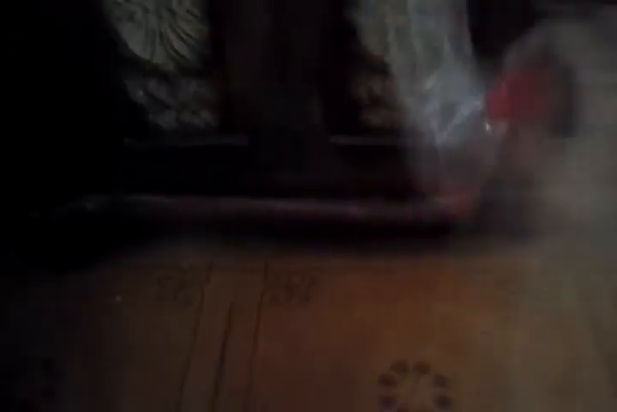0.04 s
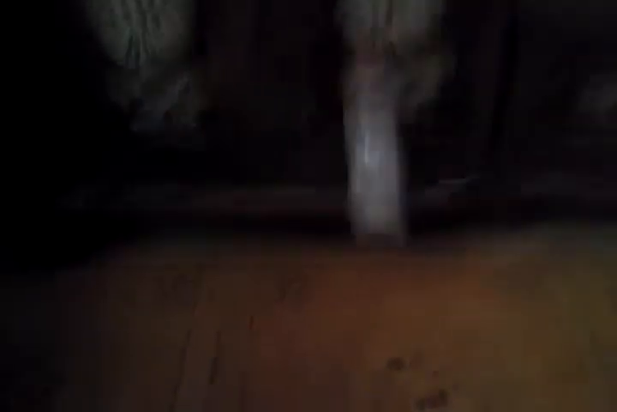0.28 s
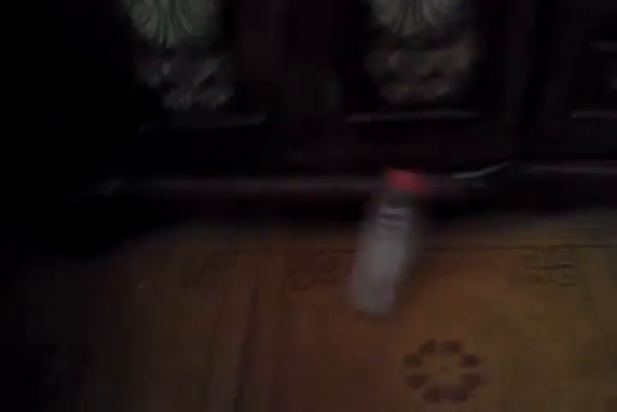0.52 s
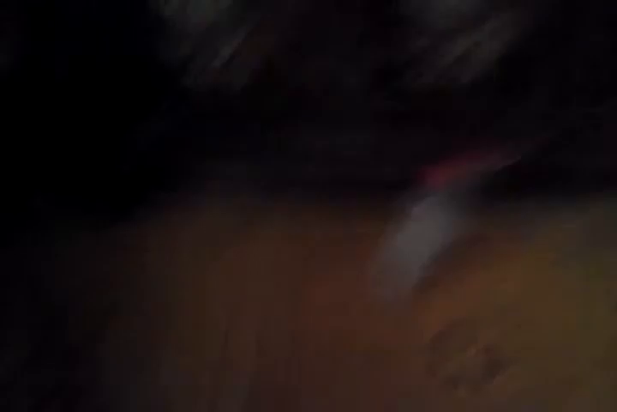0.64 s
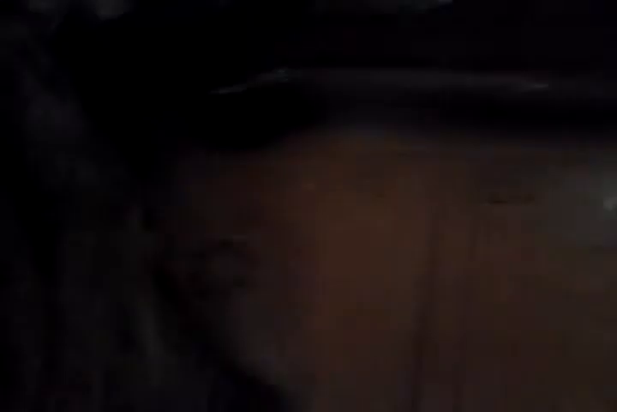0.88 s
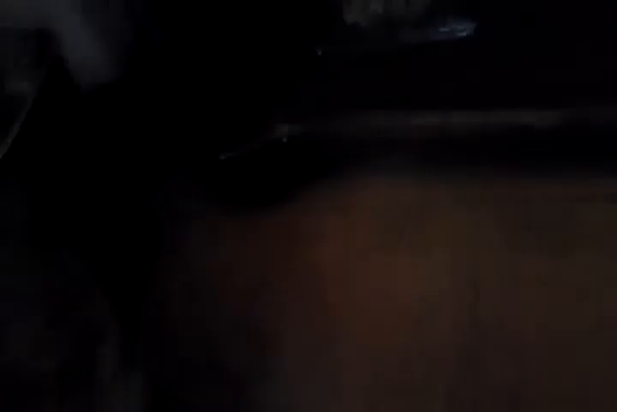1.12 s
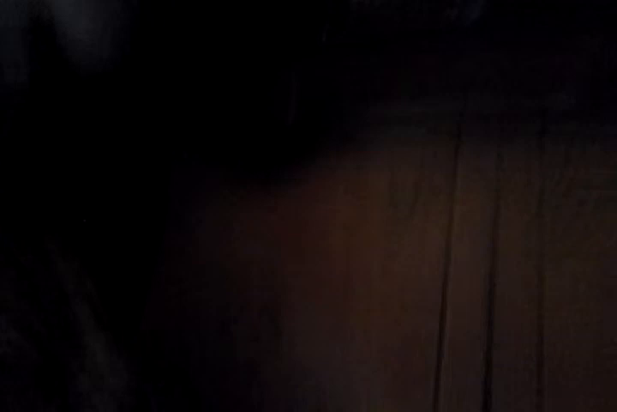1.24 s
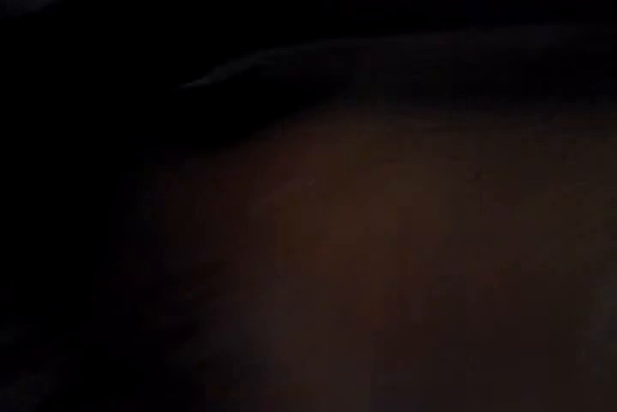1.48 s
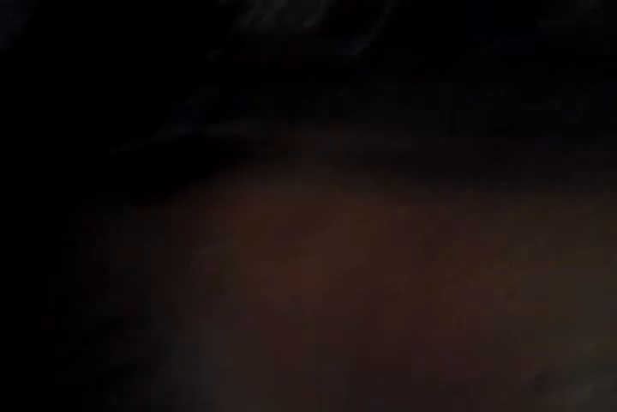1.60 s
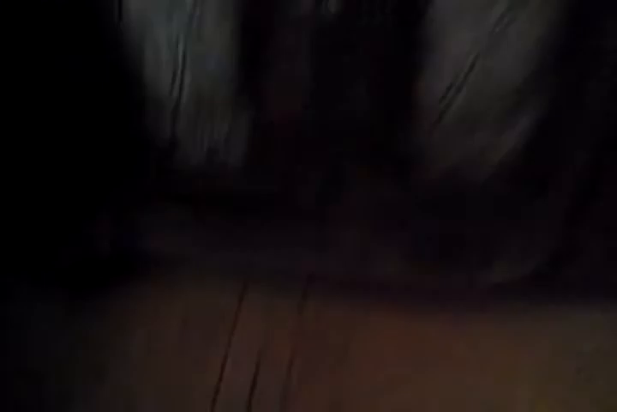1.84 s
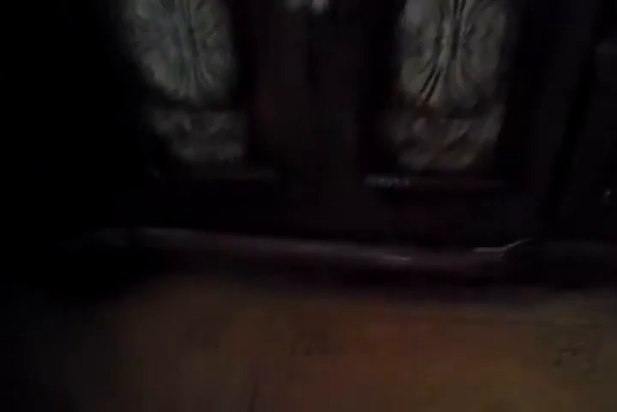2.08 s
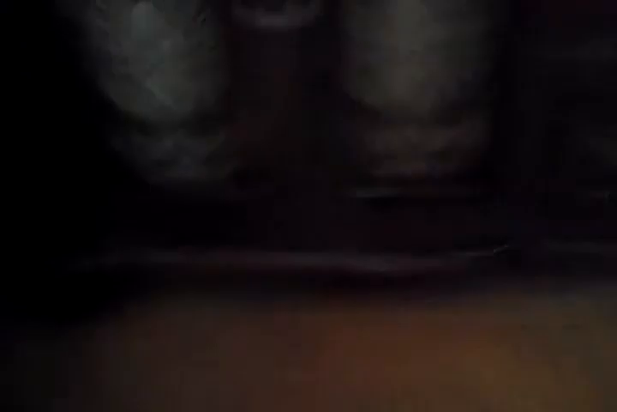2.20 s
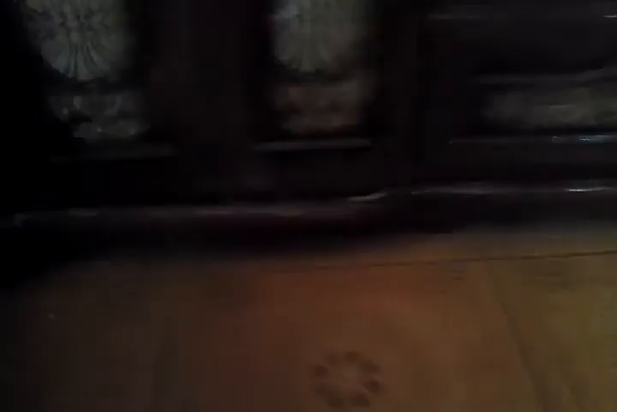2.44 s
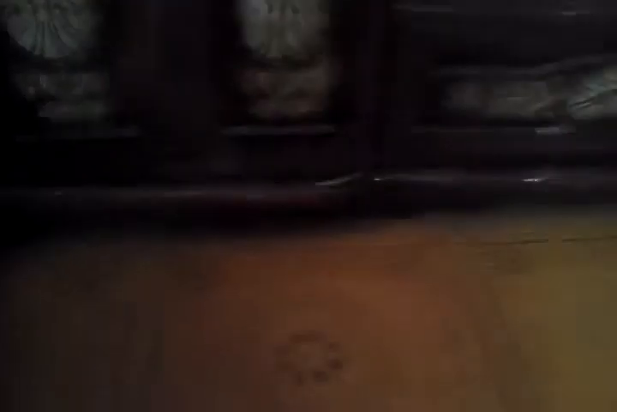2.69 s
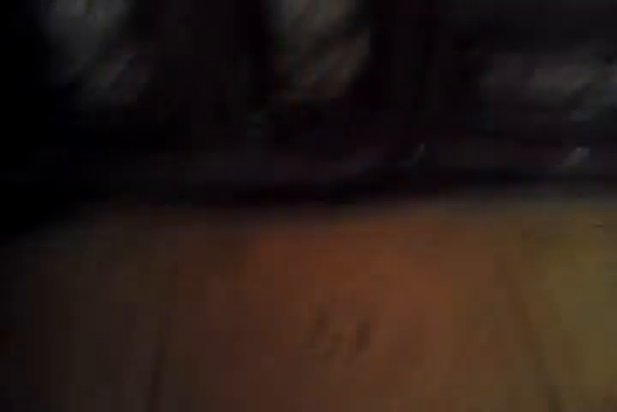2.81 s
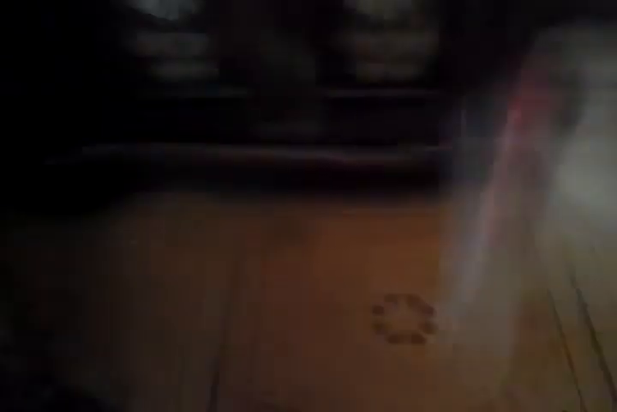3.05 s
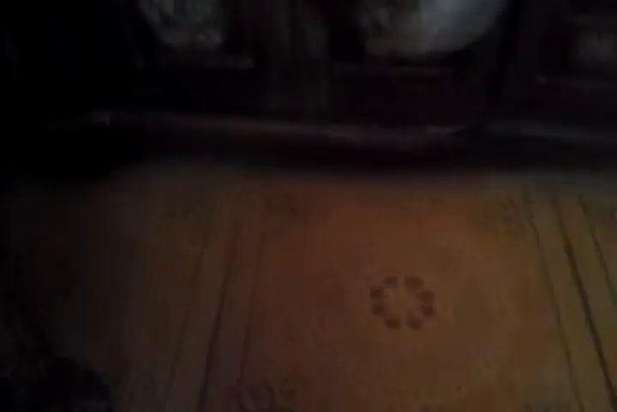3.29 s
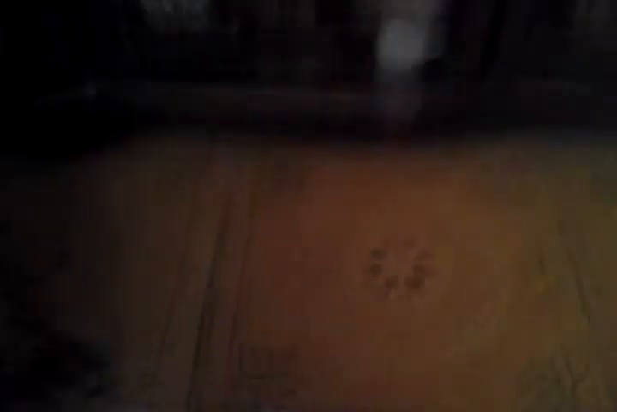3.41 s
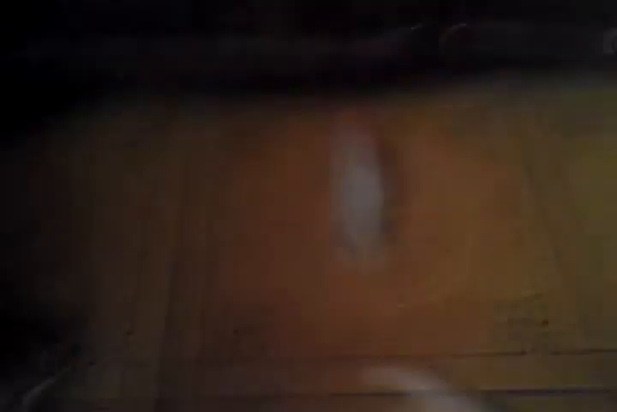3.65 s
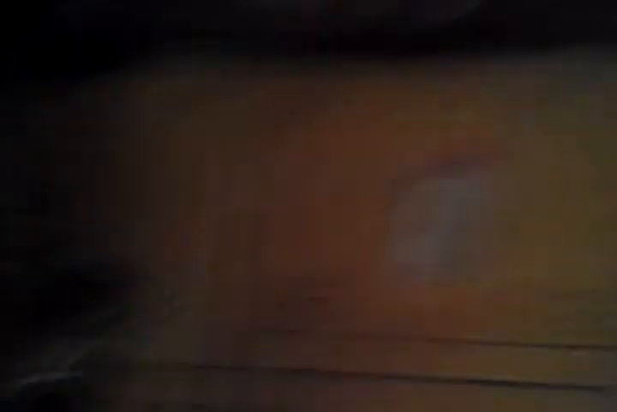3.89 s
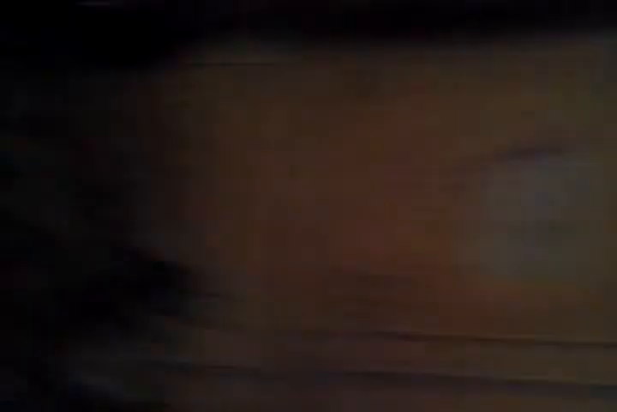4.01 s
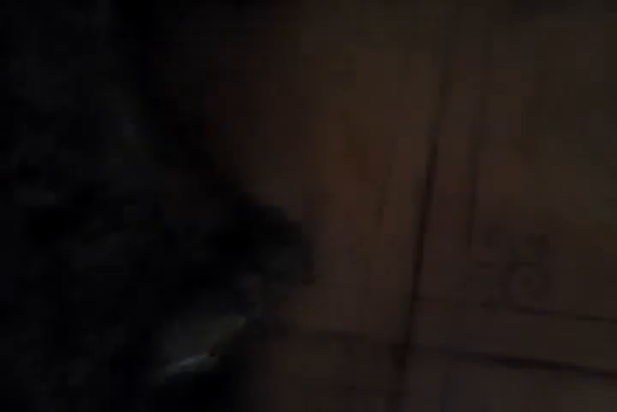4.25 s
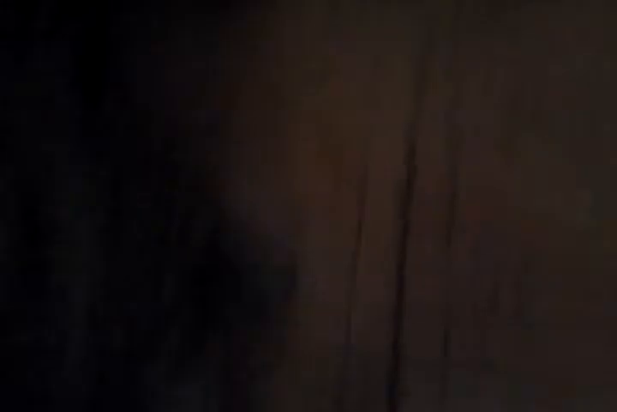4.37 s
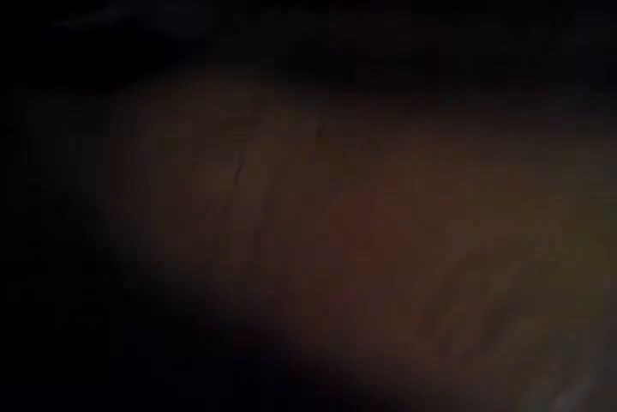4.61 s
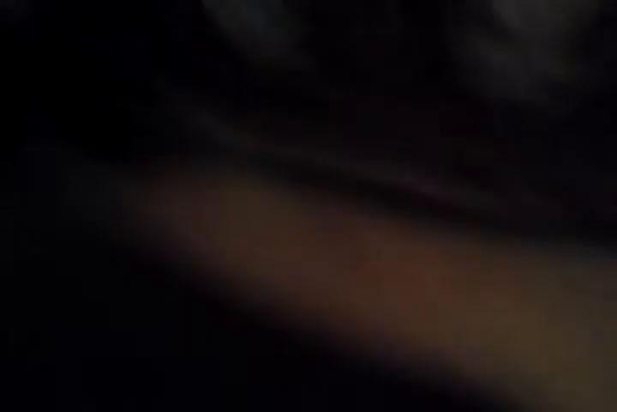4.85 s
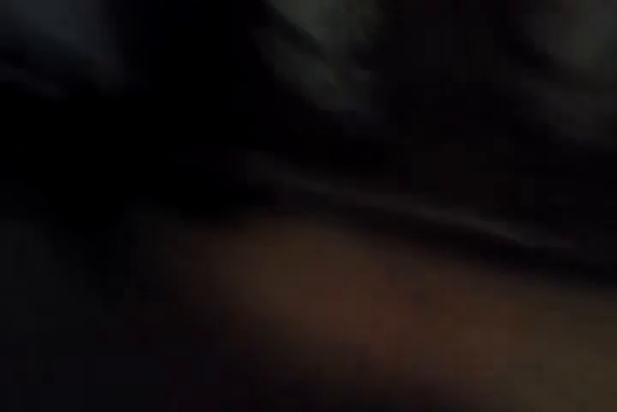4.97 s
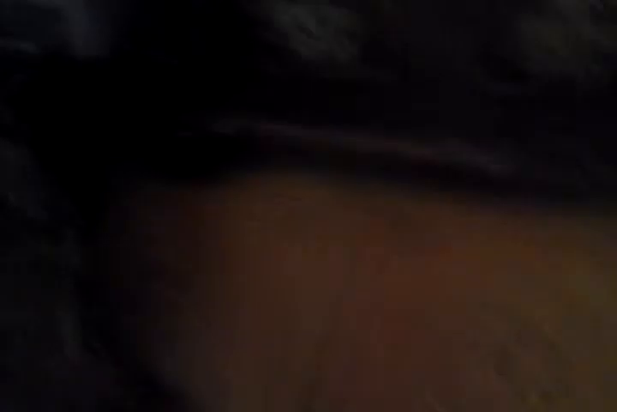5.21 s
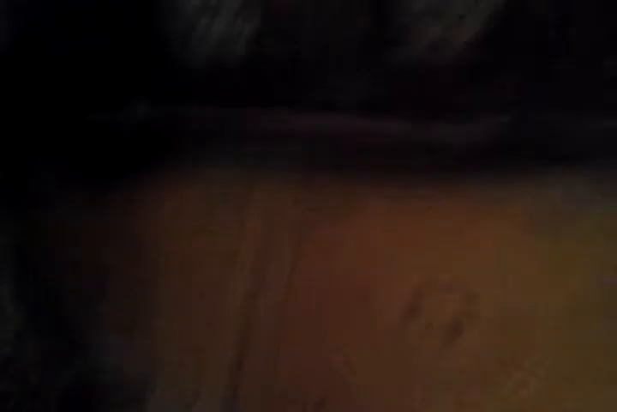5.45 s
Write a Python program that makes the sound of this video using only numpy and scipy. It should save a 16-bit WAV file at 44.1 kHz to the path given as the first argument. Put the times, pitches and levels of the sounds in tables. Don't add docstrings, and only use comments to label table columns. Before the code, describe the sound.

A small room with a rug over boards, heard through a hissy handheld camera with wide, phase-odd stereo. From 0 to 0.16 s, fingers bump the case in low thuds, strongest at left, with a grainy grip rumble fading afterwards. At 0.24-0.34 s a part-filled plastic bottle lands: loud hollow knocks, clipped peaks, water cracking on the wall, fizz and gurgle, a low floor thump. It bounces at 0.48 s and knocks over around 0.97-1.05 s. From 1.2 to 2.4 s there are quiet cloth swishes, dry plastic ticks and a soft pick-up, then mostly hiss. At 3.2 s comes a light tick and rustle; at 3.43, 3.55 and 3.66 s the second flip lands and bounces, hollow and watery, with short reflections. A sharp plastic snap at 4.18 s precedes crinkling finger ticks to 4.65 s, a small click at 4.5 s, and faint cloth rustling to the end.

```python
import sys
import numpy as np
from scipy import signal
from scipy.fft import rfft, irfft, next_fast_len
from scipy.io import wavfile
from scipy.ndimage import uniform_filter1d

SR = 44100
rng = np.random.default_rng(int(sys.argv[2]) if len(sys.argv) > 2 else 0)


def amplitude_ratio(level_db):
    exponent = np.asarray(level_db, float) / 20
    return 10 ** exponent


def output_pcm(signal):
    pcm = np.clip(np.atleast_2d(signal).T, -1, 1) * 32767
    wavfile.write(sys.argv[1], SR, np.round(pcm).astype(np.int16))


N = 245195

# frequency in Hz, density in dB per Hz.
GRIT_SPECTRUM = [(240, -0.5), (400, -6.5), (473, 1), (672, -11.5), (885, -7), (1100, -8), (2540, -15),
                 (5880, -16), (14100, -28.5), (15400, -55)]


def evened(x):
    return x / np.sqrt(np.mean(x ** 2) + 1e-20)


def read(points, hz):
    f, value = np.transpose(points)
    return np.interp(np.log(hz + 1), np.log(f + 1), value)


def add(mix, start_s, sound):
    part = mix[..., round(start_s * SR):][..., :sound.shape[-1]]
    part += sound[..., :part.shape[-1]]


def filtered(x, hz, kind):
    return signal.sosfilt(signal.butter(2, hz, kind, fs=SR, output="sos"), x)


def colour(x, spectrum, tilt_db=0):
    hz = np.fft.rfftfreq(x.shape[-1], 1 / SR)
    gain_db = read(spectrum, hz) + tilt_db * np.log2((hz + 50) / 3000)
    return irfft(rfft(x) * amplitude_ratio(gain_db), x.shape[-1])


def level(curves, column):
    t = np.arange(N) / SR
    gain = np.zeros(N)
    for curve in curves:
        points = np.array(curve)
        gain += amplitude_ratio(np.interp(t, points[:, 0], points[:, column], -120, -120))
    return uniform_filter1d(gain, size=700)


def ring(hz, db, t60_s, rise_s=0.00023):
    t = np.arange(round(t60_s * SR) + 8) / SR
    return amplitude_ratio(db - 60 * t / t60_s) * (1 - np.exp(-t / rise_s)) * np.sin(2 * np.pi * hz * t)


def crackle(shape, per_s, spread_db):
    size = amplitude_ratio(spread_db * np.minimum(rng.exponential(1, shape), 5))
    return rng.standard_normal(shape) * size * (rng.random(shape) < per_s / SR)


def ports(a, b, same, lean):
    size = next_fast_len(N + 4096)
    hz = np.fft.rfftfreq(size, 1 / SR)
    likeness = np.clip(read(same, hz), -.98, .98)
    gain = amplitude_ratio(-read(lean, hz))
    a, b = rfft(a, size), rfft(b, size)
    right = gain * (likeness * a + np.sqrt(1 - likeness ** 2) * b)
    mid = np.sqrt(1 + 2 * likeness * gain + gain ** 2)
    return irfft(2 * np.array([a, right]) / mid, size)[:, :N]


def hiss():
    # frequency in Hz, density in dB per Hz.
    hiss_spectrum = [(12, -39), (20, -7), (38, -15), (144, -5.5), (289, -4), (323, -2), (361, -6.5),
                     (647, -3), (1010, -2), (1490, -4), (2900, -13), (6150, -7.5), (9080, -17.5),
                     (14200, -24), (15400, -41)]
    # frequency in Hz, likeness of the two ports from -1 to 1.
    hiss_likeness = [(60, -0.14), (180, -0.8), (550, -0.28), (1640, 0.19), (4960, -0.11), (15000, 0.054)]
    # frequency in Hz, left over right in dB.
    hiss_lean = [(60, 2.0), (99, 2.5), (160, 1), (270, 5), (450, 3.5), (740, 2), (1220, 1), (2010, 2.5),
                 (3320, 1), (5480, -8), (9050, 5.5), (15000, -3)]
    hiss_db = -54.5
    hz, t, z = signal.stft(rng.standard_normal((2, N)), SR, nperseg=512)
    patches = uniform_filter1d(rng.standard_normal(z.shape), 6, 1)
    patches = evened(uniform_filter1d(patches, 10, 2))
    noise = signal.istft(z * amplitude_ratio(1.65 * patches), SR, nperseg=512)[1][:, :N]
    a, b = amplitude_ratio(hiss_db) * evened(colour(noise, hiss_spectrum))
    return ports(a, b, hiss_likeness, hiss_lean)


def room(x):
    # frequency in Hz, t60 in s.
    decay_times = [(120, 0.6), (300, 0.39), (700, 0.39), (1800, 0.4), (5000, 0.4), (12000, 0.37)]
    taps = np.zeros((2, SR // 2))
    at = np.arange(200, SR // 2 - 20, 20)
    at = at + rng.integers(0, 20, (2, len(at)))
    np.put_along_axis(taps, at, rng.choice([-1., 1.], at.shape), 1)
    hz, t, z = signal.stft(taps, SR, nperseg=256)
    decay = amplitude_ratio(-60 * t / read(decay_times, hz)[:, None])
    tail = signal.istft(z * decay, SR, nperseg=256)[1]
    return signal.fftconvolve(x, tail / np.linalg.norm(tail[0]), axes=1)[:, :N]


def pane():
    # frequency in Hz, level in dB, t60 in s.
    pane_modes = [(3870, -46, .6), (3905, -50, .7), (7800, -56, .2)]
    out = np.zeros((2, N))
    for hz, db, t60_s in pane_modes:
        add(out, 0, [[1], [-1]] * ring(hz, db, t60_s))
    return out


def strokes(column):
    # start in s, hold in s, soft swish in dB, crisp rustle in dB.
    slides = [(0.02, .04, -52, -51), (0.62, .04, -53, -55), (0.86, .08, -60, -58), (1.28, .4, -59, -56),
              (1.77, .07, -51, -60), (2.15, .06, -47.5, -53), (3.2, .02, -57, -52), (3.26, .01, -70, -65),
              (3.84, .22, -70, -58), (4.36, .06, -52, -54), (4.6, .05, -62, -56), (4.8, .1, -64, -61),
              (5.02, .05, -61, -54), (5.17, .3, -61, -63)]
    reach_s, reach_db, sag_db, lift_s, lift_db = .08, -16, -2, .25, -19
    curves = []
    for row in slides:
        s, hold_s = row[:2]
        end_s = s + hold_s
        shape = [(s - reach_s, reach_db), (s, 0), (end_s, sag_db), (end_s + lift_s, lift_db)]
        curves.append(np.add(shape, [0, row[column]]))
    return level(curves, column=1)


def cloth():
    # frequency in Hz, density in dB per Hz.
    swish_spectrum = [(500, -16.5), (900, -1.5), (1400, 2.5), (2100, -5.5), (3200, -28.5)]
    swish = evened(colour(rng.standard_normal((2, N)), swish_spectrum))
    rustle = evened(colour(crackle((2, N), 5000, 2.5), GRIT_SPECTRUM, tilt_db=3.5))
    return swish * strokes(column=2) + rustle * strokes(column=3)


def finger_bumps():
    # start in s, peak in dB, frequency in Hz.
    bumps = [(0.007, -34, 302), (0.032, -6, 240), (0.041, -5, 187), (0.058, -13.5, 175), (0.069, -18, 153),
             (0.101, -32, 151), (0.121, -21, 163), (0.137, -12.5, 144), (0.159, -27, 113),
             (1.588, -39, 188), (1.684, -39, 120), (1.697, -40, 155), (1.595, -42, 65), (3.547, -33, 70)]
    out = np.zeros((2, N))
    for s, db, hz in bumps:
        swing = ring(hz, 0, 4.14 / hz, rise_s=0.083 / hz)
        add(out, s, -amplitude_ratio([[db + 5.5], [db - 10.5]]) * swing)
    return filtered(filtered(out, 53, "high"), 750, "low")


def rubbing():
    # time in s, level in dB.
    rubs = [
        [(0.0, -34), (0.17, -37), (0.398, -41.5), (0.442, -49.5), (0.568, -45), (0.658, -63.5), (0.8, -68)],
        [(1.4, -64), (1.626, -59), (1.742, -71), (2.1, -73)],
    ]
    grains = filtered(crackle((2, N), 500, 2.1), [45, 330], "bandpass")
    return amplitude_ratio([[8], [-4]]) * evened(filtered(grains, 450, "low")) * level(rubs, column=1)


def snaps():
    # start in s, frequency in Hz, left in dB, right in dB, t60 in s.
    snap_modes = [(4.1771, 6200, -38, -17, .008), (4.1783, 1570, -19, -45, 0.0034),
                  (4.179, 6510, -9, 6, 0.0031), (4.1788, 4540, -28, -7, 0.0043),
                  (4.1796, 10500, -9, -29, 0.0018), (4.1808, 1460, -20.5, -31, 0.0046),
                  (4.1798, 6000, -41, -18, 0.011), (4.1825, 735, -30.5, -50, 0.012),
                  (4.1811, 2600, -21, -19, 0.0032), (4.508, 2530, -8.5, -44, 0.001),
                  (4.509, 6500, -27, -38, 0.0027), (.968, 6400, -12.5, -37, 0.014),
                  (3.2312, 6600, -22, -24, 0.013), (4.1796, 13000, -22, -32, .002),
                  (4.180, 255, -38, -52, .02)]
    out = np.zeros((2, N))
    for s, hz, left_db, right_db, t60_s in snap_modes:
        add(out, s, amplitude_ratio([[left_db], [right_db]]) * ring(hz, 3.6, t60_s, rise_s=0.000233))
    return out


def ticks():
    # start in s, peak in dB, brightness in dB per octave, left over right in dB, t60 in s.
    cracks = [(0.631, -31, 4, 0.0, 0.025), (1.27, -39, -7.5, -5, 0.02), (1.2872, -37, 7.5, -16, 0.013),
              (1.3806, -28, 0.5, 0, 0.029), (1.4194, -37, -1, -3.0, 0.02),
              (1.5244, -33.5, 1.5, -4.0, 0.049), (1.5374, -34, 2, 10, 0.051), (1.6008, -32, 1, 2, 0.021),
              (3.1615, -36, 5, 7, 0.036), (4.0352, -32, 4.5, 2, 0.014), (4.28, -38.5, 4, 1, 0.028),
              (4.345, -41, 3, -15, 0.02), (4.3614, -48, -4, -5.0, 0.02), (4.386, -40, 3, 5, 0.017),
              (4.4159, -31, 0, 3, 0.041), (4.4246, -31.5, 9, 6, 0.03), (4.446, -30, 9, 3, 0.02),
              (4.5711, -37.5, 9, 2, 0.024), (4.6059, -37, 1.5, 3, 0.024), (4.6324, -36, 2, 9, 0.02),
              (4.6444, -32, 5.5, 4, 0.017)]
    out, t = np.zeros((2, N)), np.arange(1024) / SR
    for s, db, tilt_db, pan_db, t60_s in cracks:
        grit = evened(colour(crackle((2, len(t)), 10000, 3.6), GRIT_SPECTRUM, tilt_db))
        sides = amplitude_ratio([[db - 9 + pan_db / 2], [db - 6 - pan_db / 2]])
        add(out, s, sides * amplitude_ratio(-60 * t / t60_s) * grit)
    return out


def water():
    # start in s, wall crack in dB, fizz in dB re crack, t60 in s, brightness in dB per octave.
    throws = [(0.0519, -24.5, -7, 0.13, 1), (0.0775, -33, -5, 0.6, 2), (0.1283, -22, -14, 0.3, 2.5),
              (0.2372, -10.5, -4.5, 0.14, -3), (0.2775, -1, -4.5, 0.11, -.5),
              (0.3327, -13.5, -13, 0.3, 1.5), (0.4755, -8.5, -8, 0.1, 1.2), (0.9666, -6.5, -9, 0.1, -1),
              (0.9816, -12, -10, 0.45, -2), (1.044, -21, -8.5, 0.36, 0), (3.2299, -25.5, -5.5, 0.15, 3.5),
              (3.4342, -12.5, -4, 0.36, 1.8), (3.5455, -7.5, -5.5, 0.15, 0), (3.6565, -8, -14, 0.4, -.5)]
    # frequency in Hz, density in dB per Hz.
    gurgle_spectrum = [(150, -37), (260, 2.5), (450, 4), (900, -5), (1500, -8.5), (2300, -27), (4000, -45)]
    landing_db, slop_db, swing_db = -21.5, 2, -12
    out, t = np.zeros((2, N)), np.arange(16384) / SR
    crack = amplitude_ratio(-60 * t / 0.028) * (1 - np.exp(-t / 0.002))
    for s, crack_db, fizz_db, t60_s, tilt_db in throws:
        gurgle_db = fizz_db + (slop_db if crack_db > landing_db else swing_db)
        drops = colour(crackle((2, len(t)), 9000, 3.0), GRIT_SPECTRUM, tilt_db)
        drops = evened(filtered(drops, 370, "high"))
        slops = evened(colour(crackle((2, len(t)), 2500, 1.2), gurgle_spectrum))
        surge_db = 2.0 * evened(uniform_filter1d(rng.standard_normal(len(t)), 300))
        settle = amplitude_ratio(surge_db - 60 * t / t60_s) * (1 - np.exp(-t / 0.0015))
        splash = (crack + amplitude_ratio(fizz_db) * settle) * drops
        gurgle = amplitude_ratio(gurgle_db) * settle * slops
        add(out, s, amplitude_ratio(crack_db - 2.5) * (splash + gurgle))
    return out


def floor():
    # start in s, peak in dB, frequency in Hz.
    thumps = [
        (0.236, -31, 152),
        (0.279, -12, 167),
        (0.341, -18.7, 131.6),
        (3.433, -12, 124),
        (3.436, -13, 200),
        (3.547, -16, 195),
    ]
    out = np.zeros((2, N))
    for s, db, hz in thumps:
        add(out, s, ring(hz, db - 1, .22, rise_s=0.0035) + ring(hz * 0.62, db - 6, .22, rise_s=.008))
    return out


def bottle():
    # start in s, knock in dB, knock in Hz, hollow note in dB, hollow in Hz.
    blows = [(0.2362, -1.5, 1030, -5, 400), (0.279, 5, 1040, -5.5, 278), (0.305, -2, 974, -29, 397),
             (0.335, -8, 770, -4, 349), (0.6, -25, 651, -29, 314), (0.969, -13, 2900, -6, 400),
             (0.988, -3, 800, -34, 279), (0.998, -6, 580, -13, 427), (3.231, -27, 1450, -57, 312),
             (3.435, -26, 770, 0, 275), (3.546, -2, 1800, 0, 540), (3.655, 3.5, 1080, 1, 451)]
    rebounds = [(0.288, 1, 980, -6.5, 380), (0.4772, -8.9, 656, -6, 291.3), (0.976, -4, 1720, -15, 560),
                (1.046, -13, 1513, -4.5, 330), (3.448, -19, 1050, -11.6, 251), (3.466, -10, 600, -7, 254),
                (3.483, -16, 870, -10, 325), (3.549, -2, 680, -8, 650), (3.664, -6, 1010, -8, 440)]
    touches = [
        (4.344, -31.5, 800, -25, 355),
        (4.359, -19, 710, -26.5, 409),
        (4.431, -30, 790, -30.5, 328),
        (1.456, -28.5, 556, -29, 309),
        (1.55, -22, 560, -21.5, 264),
    ]
    # factor on knock Hz, level in dB, t60 in s.
    shell_modes = [(.72, -5.5, 0.024), (.87, -11, 0.0085), (1, 0.5, 0.041), (1.17, -8.5, 0.035),
                   (1.38, -10.5, 0.043), (1.7, -16, 0.042), (2.15, -6, 0.014), (2.9, -17.5, 0.0082)]
    # factor on hollow Hz, level in dB, factor on t60.
    air_modes = [(0.802, -10.5, 0.98), (1.001, 1, 0.89), (1.268, -7, 0.98)]
    # frequency in Hz, level in dB re hollow note, t60 in s.
    base_hz, base_db, base_t60_s = (268, -11, 0.19)
    pressed_t60_s, free_t60_s, held_t60_s = .07, .23, .19
    hits = [(*row, pressed_t60_s) for row in blows]
    hits += [(*row, free_t60_s) for row in rebounds]
    hits += [(*row, held_t60_s) for row in touches]
    out, t = np.zeros((2, N)), np.arange(900) / SR
    for s, knock_db, knock_hz, hollow_db, hollow_hz, hollow_t60_s in hits:
        chatter = crackle((2, 900), 2500, 1.5) * np.exp(-t / .003) * .3
        chatter[:, 0] = 1
        chatter /= np.linalg.norm(chatter, axis=1, keepdims=True)
        rise_s = .001 if knock_db > -30 else .006
        for path, contact in zip(out, chatter):
            for factor, db, t60_s in shell_modes:
                hz = knock_hz * factor * rng.uniform(0.93, 1.06)
                wall = ring(hz, knock_db - 5.5 + db, t60_s, rise_s / 2)
                add(path, s, signal.fftconvolve(contact, wall))
            for factor, db, longer in air_modes:
                add(path, s, ring(hollow_hz * factor, hollow_db - 6 + db, hollow_t60_s * longer, rise_s))
        add(out, s, ring(base_hz, hollow_db + base_db, base_t60_s, 2 * rise_s))
    return filtered(filtered(out, 188, "high"), 188, "high")


def widened(a, b):
    # frequency in Hz, left over right in dB.
    port_lean = [(60, 1), (400, 2.5), (700, -1.5), (1300, 7.5), (2400, -3), (4000, 2.5), (5800, -7.5),
                 (7500, 0.5), (10000, 5), (15000, 5)]
    split_hz, leak_db = 716, -11
    hz = abs(np.fft.fftfreq(4096, 1 / SR))
    log_gain = np.log(amplitude_ratio(-read(port_lean, hz)))
    duct = np.fft.ifft(np.exp(np.conj(signal.hilbert(log_gain)))).real[:2048]
    shared = signal.lfilter(*signal.butter(1, split_hz, fs=SR), a + amplitude_ratio(leak_db) * b)
    right = shared + filtered(b, split_hz, "high")
    return np.array([a, -signal.oaconvolve(right, duct)[:N]])


def scene():
    knocks, splash = bottle() + floor(), water()
    echoes = room(amplitude_ratio(-19) * knocks + amplitude_ratio(-9.5) * splash)
    air = knocks + splash + echoes + amplitude_ratio(3.0) * (cloth() + pane()) + ticks()
    return widened(*air) + finger_bumps() + rubbing() + snaps() + hiss()


def thinned(x):
    # frequency in Hz, share in dB.
    bin_floor = [(5000, -42), (8000, -1.5), (11000, 0), (14500, -3)]
    # frequency in Hz, level in dB.
    band_floor = [(7000, -66), (9500, -50), (12000, -43), (14500, -37), (14900, -10)]
    hz, t, z = signal.stft(x, SR, nperseg=1024)
    band = np.sqrt(uniform_filter1d(abs(z) ** 2, size=15, axis=1))
    loudest = uniform_filter1d(band.max(1, keepdims=True), size=3, axis=2)
    jitter_db = 2.9 * rng.standard_normal((33, len(t))).repeat(16, axis=0)[:513]
    mask_db = read(band_floor, hz)[:, None] + jitter_db
    strong = abs(z) > band * amplitude_ratio(read(bin_floor, hz))[:, None]
    unmasked = band > loudest * amplitude_ratio(mask_db)
    sudden = loudest > 3.0 * np.roll(loudest, 2, axis=2)
    keep = (strong & unmasked) | sudden | (hz[:, None] < 5000)
    return signal.istft(z * keep, SR, nperseg=1024)[1][:, :N]


def low_pass(x):
    return signal.sosfilt(signal.butter(12, 15550, fs=SR, output="sos"), x)


def record(dry):
    mix = thinned(np.clip(dry, -.99, .99))
    return low_pass(mix)


dry = scene()
out = record(dry)
output_pcm(out)
```